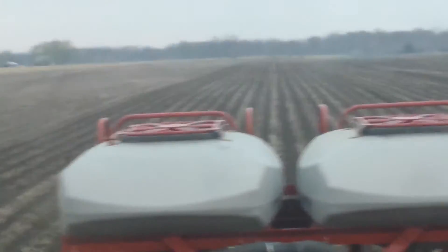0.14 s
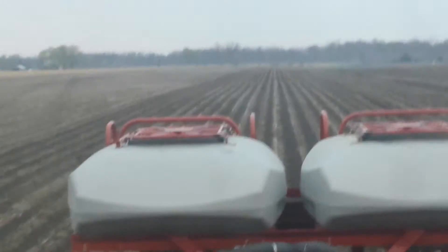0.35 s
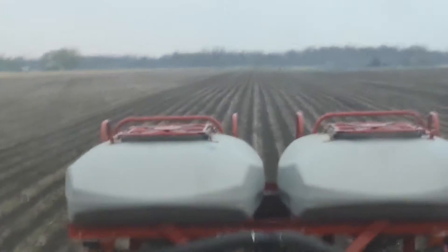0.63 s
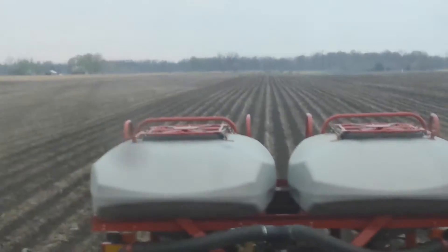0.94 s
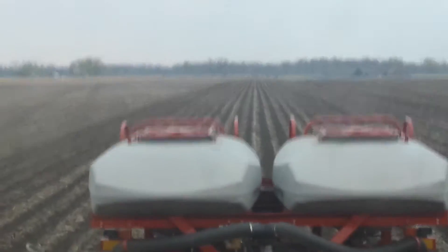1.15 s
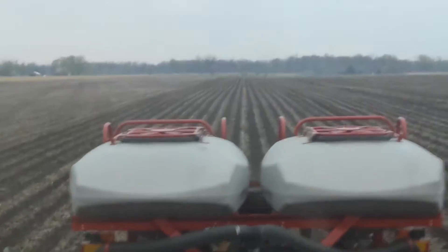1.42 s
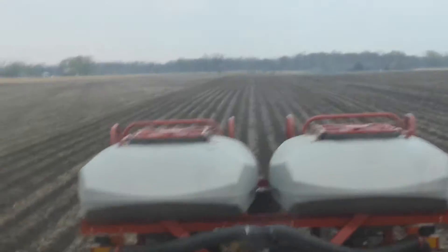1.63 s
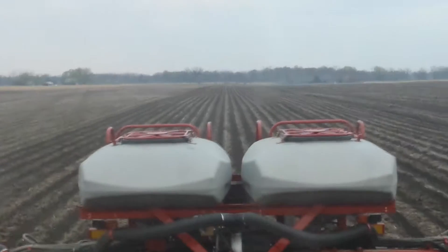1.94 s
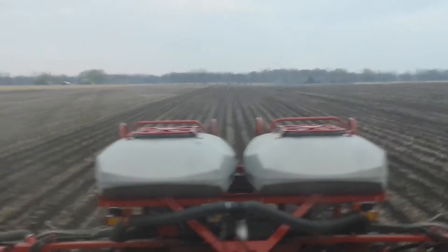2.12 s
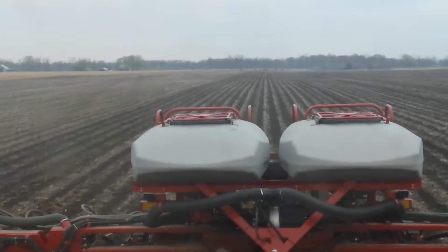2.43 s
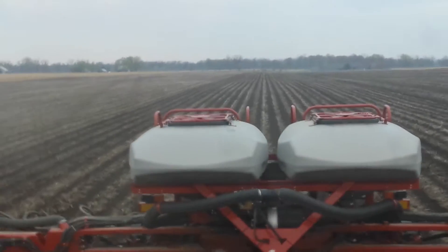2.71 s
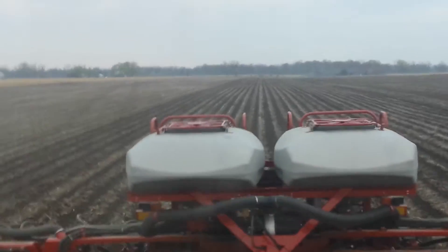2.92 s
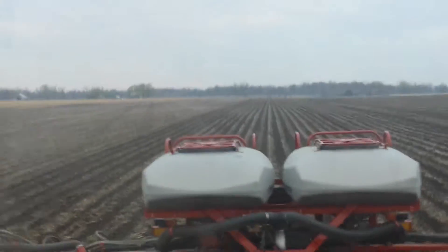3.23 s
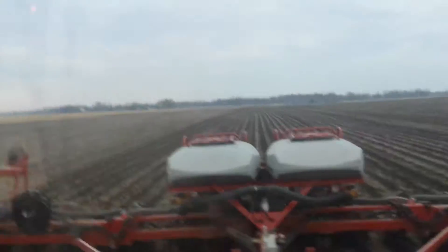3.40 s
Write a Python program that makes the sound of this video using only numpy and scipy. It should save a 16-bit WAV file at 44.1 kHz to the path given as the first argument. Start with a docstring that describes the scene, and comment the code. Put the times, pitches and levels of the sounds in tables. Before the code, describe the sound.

The steady hydraulic whine of a tractor working a field fills the cab, over a low knocking diesel drone and a broad rush of air. A faint buzz and a few soft, bright rattles reach the close microphones.

```python
"""A tractor's hydraulic pump, heard close on a stereo pair in the cab, working a field at steady revs.
The pump whines on its piston rate; the six-cylinder diesel, turning in step, drones and knocks below.
Air and machinery roar all round the microphones, coloured by the cab's resonances.
A faint electric buzz and a few rattles sit in the treble."""
import sys
import numpy as np
from scipy import signal
from scipy.fft import irfft, next_fast_len
from scipy.io import wavfile

SR = 44100
rng = np.random.default_rng(int(sys.argv[2]) if len(sys.argv) > 2 else 0)


def generate_wav(signal):
    """Clip the signal to [-1, 1] and save it as 16-bit WAV at the path in sys.argv[1]."""
    frames = np.transpose(np.atleast_2d(signal))
    scaled = np.clip(frames, -1, 1) * 32767
    pcm = np.round(scaled).astype(np.int16)
    wavfile.write(sys.argv[1], SR, pcm)


N = 156996
CUTOFF_HZ = 12775
SIDES = np.array([[.5], [-.5]])  # splits pan (left minus right) and left lead between the microphones


def from_db(db):
    """Decibels to amplitude."""
    return 10 ** (np.asarray(db) / 20)


def at_hz(rows, hz, column=1):
    """A table's column, interpolated over log frequency."""
    rows = np.array(rows)
    return np.interp(np.log(np.maximum(hz, 1)), np.log(rows[:, 0]), rows[:, column])


def in_time(rows):
    """Rows of (t/s, value), interpolated to every sample."""
    times, values = np.transpose(rows)
    return np.interp(np.arange(N) / SR, times, values)


def drift(rate_hz):
    """A slow random wander with a spread of 1."""
    hop, settle = 40, 2000
    pole = np.exp(-2 * np.pi * rate_hz * hop / SR)
    noise = rng.standard_normal(N // hop + settle + 2)
    slow = signal.lfilter([1], [1, -2 * pole, pole * pole], noise)[settle:]
    return np.interp(np.arange(N) / hop, np.arange(len(slow)), slow / slow.std())


def tone(angle, db, pan_db, lead_rad, wobble_rad=.1, waver_db=.6):
    """One sine at both microphones, wavering in level and a little in pitch."""
    pan = from_db(SIDES * pan_db)
    pan = pan / np.sqrt(np.mean(pan ** 2))
    angle = angle + wobble_rad * drift(rate_hz=6.8)
    amplitude = np.sqrt(2) * from_db(db + waver_db * drift(rate_hz=3.5))
    return amplitude * pan * np.cos(angle + SIDES * lead_rad)


def cab_spectrum(hz, over_db=0):
    """A random stereo spectrum of the cab's roar: resonances lift it, standing-wave nulls dip it."""
    # broad shape of the roar: f/Hz, level/dB per Hz
    roar_shape = [(20, -71), (30, -56.5), (56, -65), (70, -55), (85, -44), (105, -40), (140, -48.5),
                  (180, -40), (225, -46), (300, -42.5), (400, -46.5), (450, -46.5), (505, -52.5),
                  (570, -46), (640, -55), (715, -54.5), (800, -53), (920, -53), (1010, -59), (1270, -61.5),
                  (1600, -61.0), (1800, -61), (2020, -62), (2400, -65), (2650, -71), (2850, -71),
                  (3200, -72.5), (4000, -75.5), (4800, -76), (5500, -72.5), (6400, -73.5), (7200, -72.5),
                  (8000, -77.0), (9000, -77.5), (10200, -85.5), (11400, -85), (12500, -102.5)]
    # the roar across the pair: f/Hz, pan/dB, left-right correlation
    image = [(20, 0, 0.98), (105, 0, 0.98), (140, 0, 0.79), (180, 0.0, 0.89), (225, 3.0, 0.88),
             (300, -1.0, 0.87), (400, -2.0, 0.53), (505, 1.0, 0.56), (570, 0.0, 0.79), (640, -6.0, 0.55),
             (715, 1.0, 0.43), (800, 2.0, 0.58), (920, -3.0, 0.27), (1010, 0.0, 0.22), (1270, 3.0, -0.1),
             (1600, 2.0, -0.44), (1800, 4.0, -0.55), (2020, 8.0, -0.39), (2400, 9.0, 0.05),
             (2850, 3.0, 0.08), (4000, 2.0, 0.01), (4800, 1.0, -0.09), (6400, 6.0, -0.04),
             (7200, 2.0, 0.02), (8000, -2.0, -0.14), (10200, -2.0, -0.03), (12500, -3.0, -0.05)]
    # centres of the resonances and nulls: f/Hz
    mode_centres = [235, 290, 395, 525, 556, 700, 980, 1210, 1570, 1700, 1815, 1950, 2190, 2235, 2380, 2520,
                    2655, 6300]
    # their shapes, in the same order: width/Hz, gain/dB
    mode_shapes = [(14, 8), (14, -6), (30, -4.5), (20, -2.5), (16, 2), (16, 3.5), (29.8, 2.5), (22, 4.5),
                   (30, 6), (30, -5.5), (35, 2), (35, 6.5), (25, 3.5), (18, 7), (27, 4.5), (45, 9),
                   (29, 10.5), (270, 3.5)]
    lift_db = sum(db / (1 + (2 * (hz - centre) / width) ** 2)
                  for centre, (width, db) in zip(mode_centres, mode_shapes))
    level_db = at_hz(roar_shape, hz) + lift_db + at_hz(image, hz) * SIDES
    mid, side = (rng.standard_normal((2, len(hz))) + 1j * rng.standard_normal((2, len(hz)))) / 2
    alike = at_hz(image, hz, column=2)
    pair = np.sqrt(1 + alike) * mid + np.sqrt(1 - alike) * side * [[1], [-1]]
    return from_db(level_db + over_db) * pair


def comb(cycles, rate_hz, colour, tones, size=8192):
    """One cab-coloured random cycle, repeated: a comb of harmonics with gaps left for the tones."""
    hz = rate_hz * np.arange(size // 2 + 1)
    harmonics = cab_spectrum(hz, at_hz(colour, hz)) * (hz < CUTOFF_HZ) * (hz > 0)
    harmonics[:, [int(order) for order, *_ in tones]] = 0
    cycle = irfft(harmonics) * size / np.sqrt(2)
    position = cycles % 1 * size
    return np.array([np.interp(position, np.arange(size + 1), np.append(c, c[0])) for c in cycle])


def hydraulic_pump(turns, gain_db=.9):
    """Nine pistons and a gear pump on one shaft; faint side tones, some beating against the whine."""
    # pump tones: multiple of shaft speed, level/dB before gain_db, pan/dB, left lead/rad
    pump_tones = [(9, -15.0, 0.0, -0.1), (10, -26.0, 3.0, 0.1), (12, -21.0, -1.0, 0.3),
                  (18, -31.0, 1.0, -1.7), (24, -44.0, 5.0, -0.8), (27, -26.0, -4.0, 0.3),
                  (36, -39.0, 1.0, 0.3), (41, -47.0, 2.0, -0.6), (45, -44.0, 0.0, -2.6),
                  (50, -54.0, -6.0, -1.5), (54, -49.0, -1.0, 2.1), (63, -43.0, 16.0, 2.1),
                  (74, -54.0, 7.0, 0.3), (81, -49.0, 9.0, 0.6), (90, -57.0, 8.0, -1.0)]
    # side tones between the pump's harmonics:
    # multiple of shaft speed, start/rad, level/dB before gain_db, pan/dB, left lead/rad
    side_tones = [(13.324, 0, -29, -14, -.9), (17.974, -1.31, -39, 0, -.45), (18.056, 2.96, -39.5, -4, -.3),
                  (18.099, .64, -40, 3, -.6), (25.76, 0, -39, 7, .1), (36.132, 4.02, -43.5, -9, .05)]
    gear_pump_order = 12
    fade_db = in_time([(2.25, .7), (2.55, -2), (3.4, -2.5)])  # the gear pump's tone weakens late
    angle = 2 * np.pi * turns
    pump_angle = angle + 3.341  # the start angle against the engine times their beats
    whine = sum(tone(order * (pump_angle + order), db + fade_db * (order == gear_pump_order), *place)
                for order, db, *place in pump_tones)
    between = sum(tone(order * angle + start, *rest) for order, start, *rest in side_tones)
    return from_db(gain_db) * (whine + between)


def diesel_engine(cycles):
    """Strong engine orders drone over a knock that repeats every four-stroke cycle."""
    # engine tones: multiple of the cycle rate, level/dB, pan/dB, left lead/rad
    engine_tones = [(6, -27.0, 0.0, -0.1), (8, -31.0, 1.0, -0.1), (10, -36.0, 0.0, -0.1),
                    (12, -27.0, -1.0, 2.0), (14, -29.0, 0.0, 0.1), (20, -27.0, 2.0, -0.0),
                    (22, -35.0, 2.0, -0.2), (23, -32.0, -1.0, 0.2), (36, -38.0, -2.0, 0.6),
                    (37, -34.0, -6.0, -0.5), (39, -41.0, -1.0, -0.4), (42, -39.0, 2.0, 0.2),
                    (48, -39.0, -11.0, -0.8), (49, -43.0, 2.0, 1.2), (66, -41.0, 11.0, -2.0),
                    (78, -49.0, 3.0, 1.7), (84, -51.0, 4.0, -0.5), (87, -46.0, 0.0, 2.6),
                    (88, -49.0, -8.0, 1.3), (93, -50.0, 0.0, -2.0), (96, -51.0, 6.0, 0.5),
                    (98, -50.0, -11.0, 2.3), (100, -43.0, 1.0, -0.1), (102, -46.0, 5.0, 1.0),
                    (105, -49.0, 10.0, 0.6), (113, -49.0, 8.0, 2.5), (114, -45.0, 9.0, 2.2),
                    (126, -51.0, 7.0, 2.7), (137, -50.0, -6.0, 1.9), (139, -46.0, 5.0, -2.6),
                    (156, -50.0, 11.0, -2.5), (159, -44.0, 11.0, 3.0), (162, -50.0, 11.0, -0.9),
                    (182, -50.0, 19.0, -2.4), (184, -44.5, 19.0, 1.7), (186, -52.0, 18.0, 1.1)]
    # the knock's harmonics: f/Hz, level/dB over one Hz of roar
    knock_colour = [(30, 4), (300, 8.5), (1000, 5), (2500, 5), (4000, -7), (6000, -12)]
    drone = sum(tone(order * (2 * np.pi * cycles + order), *rest) for order, *rest in engine_tones)
    cycle_hz = (cycles[-1] - cycles[0]) * SR / N
    return drone + comb(cycles, cycle_hz, knock_colour, engine_tones)


def cab_roar(whirr_from_hz=1750, treble_from_hz=2700, flutter_db=.5):
    """Broad air and machinery noise; whirr and treble swell, and each upper band flutters on its own."""
    # swell of the machinery whirr: t/s, level/dB (taken about its mean)
    whirr = [(0.1, -33), (1.2, -34), (3.4, -35.5)]
    # swell of the treble: t/s, level/dB (taken about its mean)
    treble = [(0.1, -37), (0.7, -39), (1.14, -38), (3.1, -38.5), (3.24, -37.5), (3.45, -38.5)]
    # borders between the three treble bands: f/Hz
    treble_edges = [4800, 7600]
    size = next_fast_len(N)
    hz = np.arange(size // 2 + 1) * SR / size
    spectrum = cab_spectrum(hz) * np.sqrt(size * SR / 2)
    edges = [whirr_from_hz, treble_from_hz, *treble_edges]
    above = [1 / (1 + (edge / np.maximum(hz, 1)) ** 8) for edge in edges] + [0]  # soft high-passes
    roar = irfft(spectrum * (1 - above[0]), size)[:, :N]
    for swell, lower, upper in zip((whirr, treble, treble, treble), above, above[1:]):
        band = irfft(spectrum * (lower - upper), size)[:, :N]
        swell_db = in_time(swell)
        roar += band * from_db(swell_db - swell_db.mean() + flutter_db * drift(rate_hz=10))
    return roar


def electric_buzz(rate_hz=49.82):
    """A steady electric comb with a few tones standing out."""
    # the comb's harmonics: f/Hz, level/dB over one Hz of roar
    buzz_colour = [(2000, -8), (3500, -2), (6000, 5), (9000, 3), (12000, 6)]
    # strong tones: multiple of the buzz rate, level/dB, pan/dB, left lead/rad
    buzz_tones = [(48, -49, 0, 1.0), (125, -63, 11, 1.4), (128, -60, 8, -1.6)]
    cycles = rate_hz * np.arange(N) / SR
    tones = sum(tone(2 * np.pi * order * cycles, *rest) for order, *rest in buzz_tones)
    return tones + comb(cycles, rate_hz, buzz_colour, buzz_tones)


def rattles(rise_s=.01, band_hz=(5300, 7200), pan_db=5.5):
    """Short soft bursts of bright noise, nearer the left microphone."""
    # rattles: t/s, level/dB at the crest
    bursts = [(0.1131, -40), (0.8, -39), (1.15, -37), (1.368, -40), (1.5466, -37.5), (1.94, -41),
              (2.525, -38), (2.8144, -38), (3.2564, -39), (3.3554, -37), (3.4052, -42), (3.5084, -37)]
    envelope = np.zeros(N)
    for start_s, db in bursts:
        age = np.maximum(np.arange(N) / SR - start_s, 0) / rise_s
        envelope += from_db(db) * age * np.exp(1 - age)
    band = signal.butter(3, band_hz, "band", fs=SR, output="sos")
    noise = signal.sosfilt(band, rng.standard_normal((2, N)))
    return envelope * noise / noise.std() * from_db(SIDES * pan_db)


def scene():
    """The mix in the cab; pump and engine follow one slightly wandering shaft speed."""
    # pitch of the pump's third piston harmonic, 27 times the shaft speed: t/s, f/Hz
    whine_pitch = [(0.0, 835.0), (0.22, 834.6), (0.45, 831.6), (0.67, 834.0), (0.89, 834.9), (1.11, 835.0),
                   (1.33, 835.4), (1.56, 833.4), (1.78, 833.3), (2.0, 833.8), (2.23, 831.8), (2.45, 839.1),
                   (2.67, 834.5), (2.89, 833.7), (3.12, 836.3), (3.34, 837.4), (3.56, 832.4)]
    pump_turns = np.cumsum(in_time(whine_pitch)) / 27 / SR
    engine_cycles = pump_turns * .44565  # four-stroke cycles per pump turn
    machinery = hydraulic_pump(pump_turns) + diesel_engine(engine_cycles)
    return machinery + cab_roar() + electric_buzz() + rattles()


def record(dry, ceiling=1.4):
    """Peaks are rounded and the highest treble is cut steeply."""
    low_pass = signal.ellip(10, .5, 80, CUTOFF_HZ, fs=SR, output="sos")
    return signal.sosfilt(low_pass, ceiling * np.tanh(dry / ceiling))


dry = scene()
out = record(dry)
generate_wav(out)
```